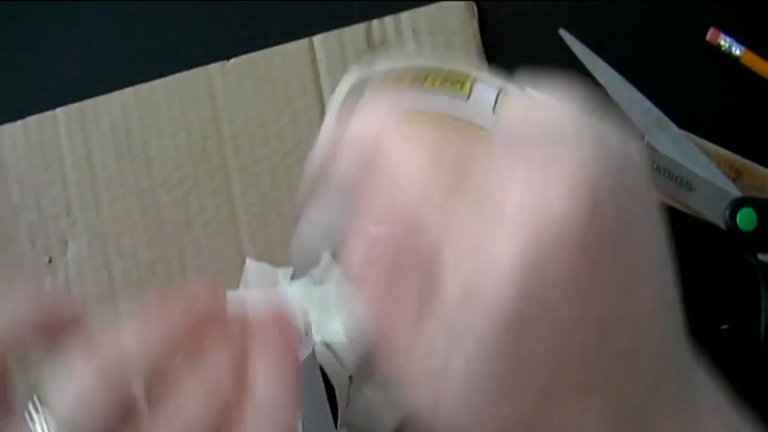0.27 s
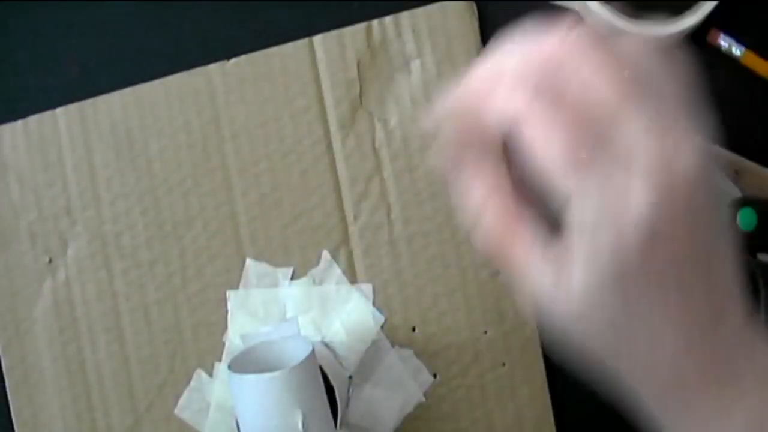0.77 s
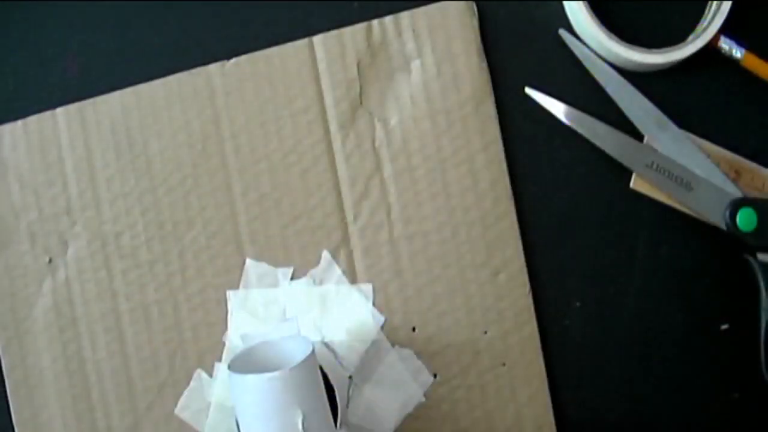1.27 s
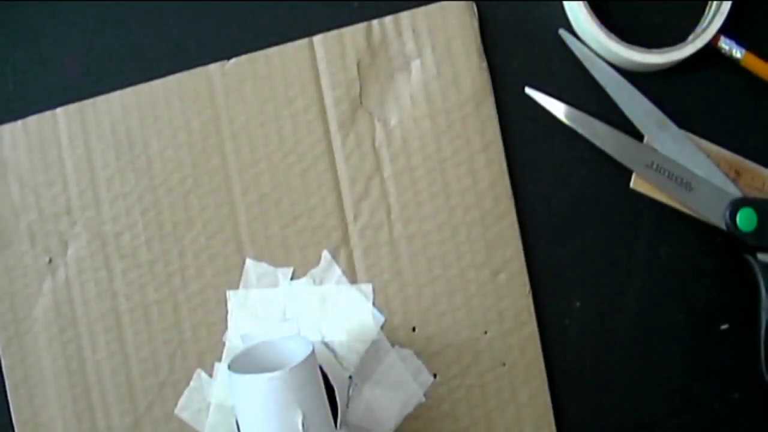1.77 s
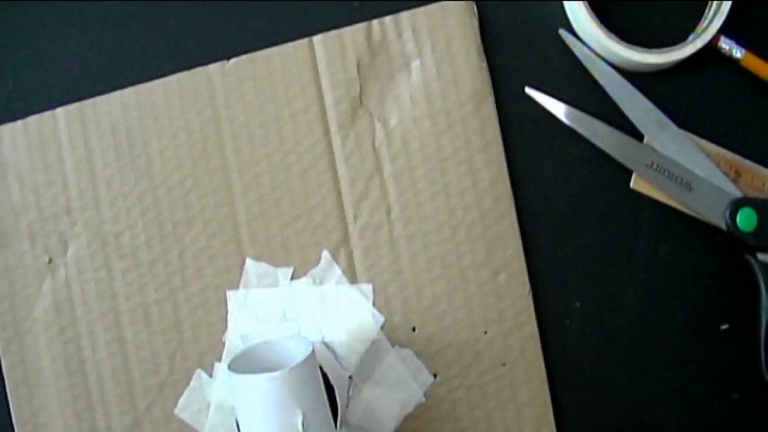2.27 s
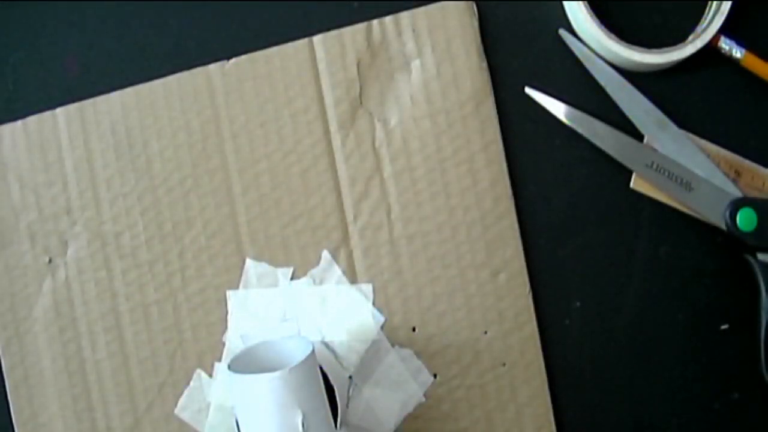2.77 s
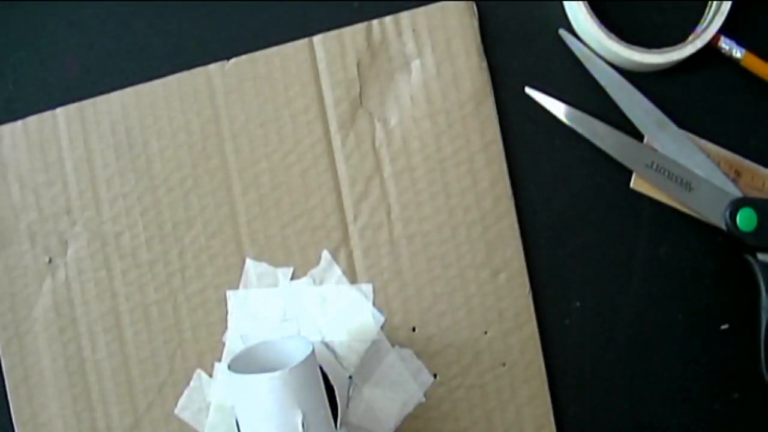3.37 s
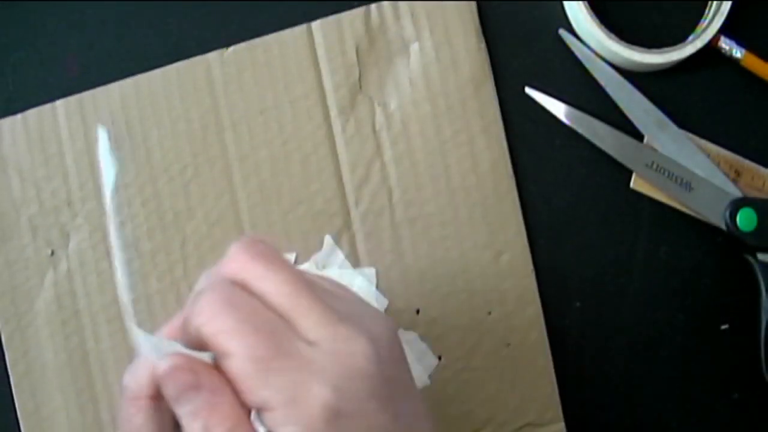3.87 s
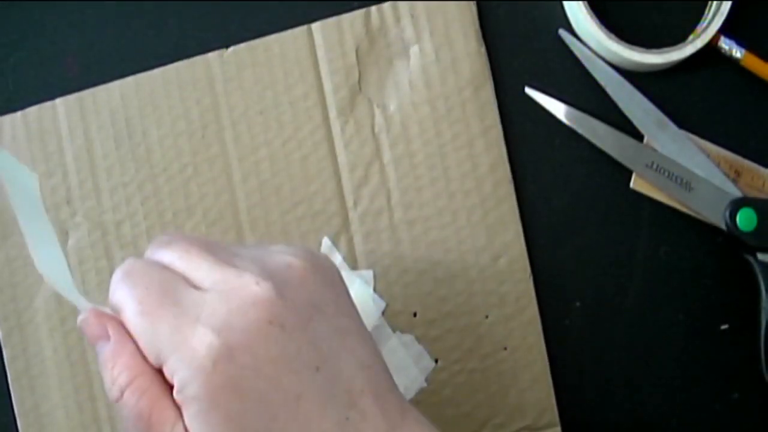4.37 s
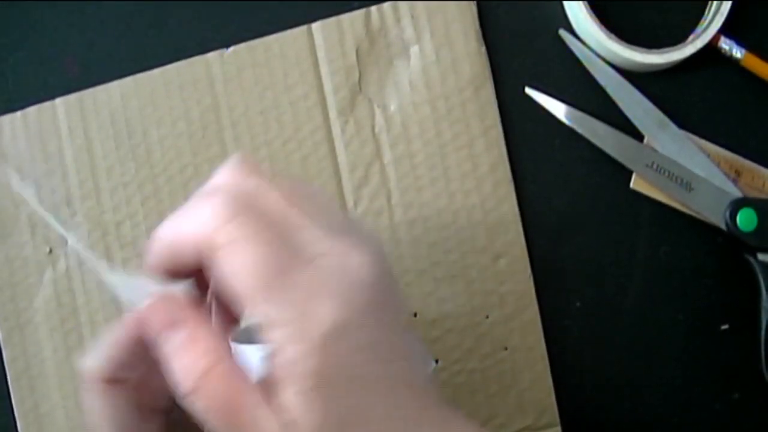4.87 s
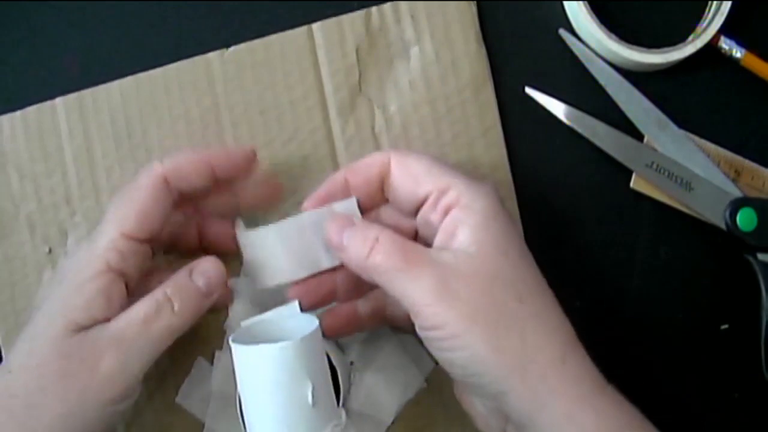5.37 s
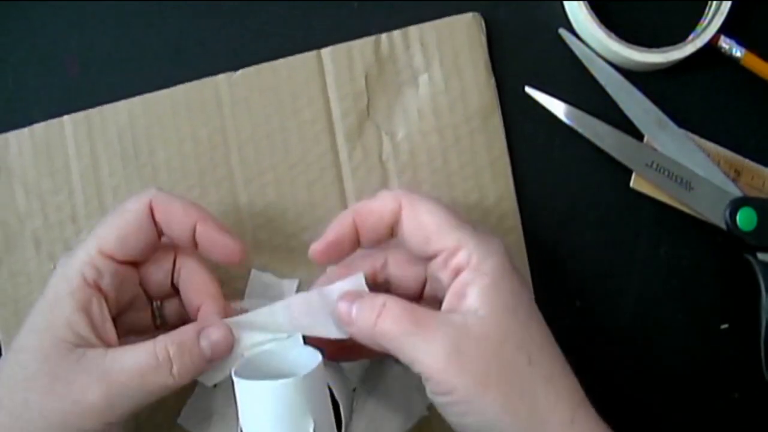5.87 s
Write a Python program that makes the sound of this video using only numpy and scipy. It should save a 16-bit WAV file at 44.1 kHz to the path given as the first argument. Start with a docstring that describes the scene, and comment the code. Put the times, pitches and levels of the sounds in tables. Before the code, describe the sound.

Short growing rips of tape burst out first, bright and dry. A hollow cardboard roll lands, rattles from rim to rim faster and faster, and settles while the table resonates deeply. Over faint rumble and hiss come isolated small clicks, a loud double rip, light scraping and crackling fingers, soft pats, and a light tap before a delicate prolonged rasp. Everything is close, in a small room with a short tail.

```python
"""Masking tape is pulled and torn off its roll in short growing rips, close to a desk microphone, with light rubs.
The roll is put down and rocks to rest: its cardboard core clatters and rings, the table booms and sways.
Fingers pick at the strip, tap the tube, tear twice more, then smooth it with a long rasp of tiny releases.
Between the events a small quiet room answers, over faint rumble and microphone hiss."""
import sys
import numpy as np
from scipy import signal
from scipy.fft import rfft, irfft, next_fast_len
from scipy.io import wavfile
from scipy.ndimage import uniform_filter1d, map_coordinates

SR = 44100
rng = np.random.default_rng(int(sys.argv[2]) if len(sys.argv) > 2 else 0)


def dump(signal):
    """Clip the signal to [-1, 1] and save it as 16-bit WAV at the path in sys.argv[1]."""
    limited = np.clip(np.atleast_2d(signal).T, -1, 1)
    pcm = np.round(limited * 32767).astype(np.int16)
    wavfile.write(sys.argv[1], SR, pcm)


N = 269318  # length in samples

# rips of tape and faint light rubs or scuffs of it; swell is the climb to the final level,
# body and edge tilt the lows and the highs:
# start_s, end_s, final_level_db, swell_db, body_db, edge_db
RIPS_AND_RUBS = [(0.203, 0.224, -32, 10.5, -6.5, 0), (0.214, 0.236, -24, 8.5, -4.5, 1),
                 (0.3645, 0.385, -32.5, 8.5, -13, 1), (0.458, 0.47, -32.5, 9.5, -8.5, -1),
                 (0.605, 0.641, -57, 3, -7, -15), (1.325, 1.346, -49.5, 16, 6.5, 23.5),
                 (1.969, 1.996, -46, 19.5, -1.5, 2.5), (2.432, 2.487, -69.5, -0.5, -13, -10),
                 (2.596, 2.634, -63.5, 0.5, -5.5, -3), (3.147, 3.1665, -28, 41.5, 10.5, -4.5),
                 (3.2472, 3.2537, -23, 10.5, 3.5, 0.5)]
# colour of the ripped or rubbed tape: pitch_hz, level_db
TAPE = [(150, -28.5), (400, -14.5), (700, -15), (1450, -5.5), (2400, -4), (4000, 2), (7000, -2),
        (11500, -1.5), (16000, -11.5)]
# snaps of the strip, and a light tap on the cardboard tube:
# start_s, low_db, middle_db, high_db, note_hz, t60_s
SNAPS_AND_TAP = [(0.2039, -72, -47.5, -48, 2520, 0.0076), (.36, -67, -42, -42, 4240, 0.0031),
                 (0.4697, -59.5, -34.5, -44, 3660, .007), (1.917, -60, -57.5, -48.5, 11000, 0.013),
                 (2.0117, -54.5, -40, -42.5, 11920, 0.013), (2.604, -63.5, -59.5, -59, 1850, 0.016),
                 (3.238, -54.5, -43.5, -47.5, 4514, 0.0079), (5.1454, -59.5, -62, -73, 950, 0.024),
                 (5.705, -58, -67, -76, 1250, 0.015), (5.961, -43, -44.5, -37.5, 8160, 0.022)]
# short squeaks of tape, and the tap's bright part: start_s, pitch_hz, level_db
SQUEAKS = [(1.8243, 2770, -48.5), (3.527, 3350, -57), (3.6124, 3460, -52), (5.1454, 3000, -54.5)]

# the roll lands, rocks from rim to rim ever faster and falls flat: start_s, low_db, middle_db, high_db
KNOCKS = [(.558, -29.5, -31, -40.5), (.611, -38, -44, -51.5), (.699, -40.5, -51, -65),
          (0.7754, -38, -49, -68), (0.8432, -38.5, -51, -64), (0.9003, -41.5, -50.5, -65),
          (.958, -41.5, -48, -66), (1.0048, -39, -43.5, -64.5), (1.045, -41.5, -49, -61),
          (1.0767, -36.5, -39, -45.5)]
# ringing modes of the cardboard core: pitch_hz, level_db, t60_s
CORE = [(252, -5.5, .13), (339.3, 5, 0.11), (402, -1, .15), (510, -1, 0.1312), (606, 6, 0.11),
        (1080, 4, .05), (1765, 9, .09), (3680, 7.5, .05)]
# low part of a knock: pitch_hz, level_db
THUMP = [(110, -33.5), (290, 0.5), (650, 0.5), (850, -9.5), (4000, -72)]
# middle part of a knock: pitch_hz, level_db
CLACK = [(500, -25.5), (800, 1.5), (1150, 3), (1450, -5), (1850, -10), (5000, -58)]
# high part of a knock: pitch_hz, level_db
CRACK = [(1000, -27), (2100, 8.5), (2550, 3), (3000, 3.5), (4700, -11.5), (6000, -28), (15000, -46)]
# colour of the rim rolling between contacts: pitch_hz, level_db
RUMBLE = [(120, -18), (250, -1.5), (340, 0), (470, -8), (610, 1), (800, -18.5), (1800, -19.5), (4000, -50)]
ROLLING_DB = -57.5

# weight landing on the table, and a soft bump of the hand: start_s, boom_db, dull_puff_db, puff_top_hz
THUDS = [(0.56, -34.5, -36.5, 154), (0.957, -45, -61, 104), (1.079, -37.5, -49.5, 151),
         (3.85, -88, -52, 59), (4.445, -50.5, -45, 252), (4.469, -61, -42.5, 69.9)]
# ringing modes of the table top: pitch_hz, level_db, t60_s
TABLE = [(54, -16, 0.91), (65.4, -12.5, 1), (127.6, -1.5, 0.49), (229.3, -1.5, 0.23)]
# shoves that set the table swinging on its legs: start_s, level_db
SHOVES = [(.32, -58), (.56, -37), (.83, -32), (1.058, -33), (3.33, -62.5), (3.84, -50.5), (4.44, -46.5),
          (5.96, -57.5)]
SWAY_RISE_S, SWAY_T60_S = 0.064, 0.91

# short strokes of the fingers along the tape: start_s, end_s, level_db, pressure (0-1)
STROKES = [(3.27, 3.316, -64, .1), (3.358, 3.39, -66, 0.1), (3.503, 3.507, -78.5, 0),
           (3.791, 3.827, -47.5, 0.5), (3.84, 3.887, -63, 0.26), (3.939, 3.989, -51.5, 0.34),
           (4.011, 4.054, -55, 0.39), (4.098, 4.108, -50.5, 0.76), (4.125, 4.197, -57, 0.78),
           (4.261, 4.284, -65, 1), (4.436, 4.523, -68.5, 0.89), (4.648, 4.764, -61, 0.29),
           (4.776, 4.788, -59.5, 0.03), (5.886, 5.894, -64.5, 0.75), (5.905, 5.916, -50.5, 0.67),
           (5.982, 6.008, -63.5, 0.6)]
ATTACK_S, RELEASE_S = 0.11, 0.12  # a stroke's rise and fall over 60 dB
SCRAPE_LIGHT_DB, SCRAPE_FIRM_DB = -16, 4.5  # against the rasp, at pressure 0 and 1
HISS_LIGHT_DB, HISS_FIRM_DB = 6.5, -16  # likewise
# one long slide smooths the strip: time_s, level_db
SLIDE = [(5.19, -92), (5.228, -60), (5.362, -58.5), (5.402, -65.5), (5.558, -59), (5.66, -69), (5.7, -61.5),
         (5.804, -77.5), (5.88, -61)]
SLIDE_PRESSURE, SLIDE_SETTLE_S = 0.77, 0.15  # the fingers bear down gradually
SLIDE_RASP_DB, SLIDE_BRUSH_DB = 5, -6.5  # the taut strip rasps more; the hands brush the cardboard
STROKE_BRUSH_DB = -18.5  # brushing under a stroke's scrape
# colour of the coarse scrape: pitch_hz, level_db
SCRAPE = [(300, -13.5), (700, -7.5), (1200, 2), (1500, 0.5), (1850, 3), (2400, -1), (3300, -24)]
# colour of the rasp over the ridges: pitch_hz, level_db
RASP = [(1500, -18.5), (2400, -4), (3500, 1), (4400, -3), (5300, -1.5), (6100, -7.5), (7500, -38),
        (8500, -30)]
# colour of the light sliding hiss: pitch_hz, level_db
HISS = [(3500, -22.5), (5500, 0), (7300, 0.5), (9000, -2.5), (12000, -4), (16000, -31.5)]
# colour of hands brushing the cardboard: pitch_hz, level_db
BRUSH = [(100, -19), (220, 5.5), (330, 12.5), (550, -17), (900, -26), (2000, -35)]
# the free strip resonates, higher as the grip shortens it: time_s, pitch_hz, boost_db
STRIP = [(3.3, 5350, 5.5), (4.7, 5360, 2.5), (5.23, 2500, 5.5), (5.33, 3500, 3), (5.64, 3950, 5),
         (5.8, 3340, 6.5)]
# soft pats and scuffs of the hands on the cardboard: start_s, level_db, pitch_hz
PATS = [(3.355, -67, 294), (4.45, -51, 275), (5.15, -65.5, 550), (5.29, -66, 285), (5.52, -64.5, 270),
        (5.866, -63, 500)]

# height of the tape over the table: time_s, height_m
HEIGHT = [(.22, 0.16), (.47, .22), (3.2, 0.067), (3.95, 0.048), (4.15, 0.072), (5.21, 0.022), (5.31, 0.067),
          (5.45, 0.078), (5.92, 0.052)]
# decay of the small room: pitch_hz, t60_s
ROOM = [(150, 0.46), (600, .25), (2000, .24), (5000, .25), (11000, 0.17), (16000, 0.21)]
# microphone colour: pitch_hz, level_db
CAPSULE = [(10000, -2), (11700, 1), (12200, -2), (12700, -5.5), (16000, -11.5)]
# colour of the room rumble and microphone hiss: pitch_hz, level_db
FLOOR = [(12, -10), (28, -12), (50, -24), (90, -32), (150, -39), (230, -31), (300, -50), (358, -36.5),
         (1500, -46.5), (2900, -43), (3500, -46), (16000, -52.5)]
FLOOR_DB = -79.5  # of the part above 200 Hz
TOP_HZ = 15900  # band limit of the recorder


def rips_and_rubs(stop_s=0.012, body_hz=1700, edge_hz=7000):
    """Rips grow and stop short; light rubs scuff faintly: noise and tiny releases under one envelope."""
    out, t = np.zeros(N), np.arange(SR // 8) / SR
    for start, end, db, swell_db, body_db, edge_db in RIPS_AND_RUBS:
        length = max(end - start, .002)
        growth_db = swell_db * (np.minimum(t / length, 1) - 1)
        stop_db = -60 * np.maximum(t - length, 0) / stop_s
        grains = crackle(len(t), rate=2200, spread_db=1.5) + 0.84 * rng.standard_normal(len(t))

        def tone(hz):
            """Tape colour with the lows and the highs tilted for this event."""
            body = body_db / (1 + (hz / body_hz) ** 4)
            edge = edge_db / (1 + (edge_hz / (hz + 1)) ** 4)
            return along(TAPE, hz) + body + edge

        moved = colour(grains * amp(growth_db + stop_db), tone)
        add(out, start, amp(db) * moved / np.std(colour(grains, tone)))
    return out


def snaps_and_tap(lead_s=0.017, lead_db=-17, gain_db=-11.0, note_db=6, octaves=0.12):
    """A brief shiver of noise, strongest near a note, after a faint quick swell: paper buckles, or a tap."""
    out, t = np.zeros(N), np.arange(-SR // 48, SR // 24) / SR  # the hit is at t = 0
    for s, low_db, mid_db, high_db, note_hz, t60 in SNAPS_AND_TAP:
        lead = amp(lead_db + 20 * t / lead_s)
        envelope = np.where(t < 0, lead, amp(-60 * t / t60))
        spectrum = [(150, low_db - 27), (1200, low_db + 4.5), (2300, mid_db - 3.5), (3500, mid_db - 3.5),
                    (6000, (mid_db + high_db) / 2 - 1), (11800, high_db), (16000, high_db - 17)]
        size = np.linalg.norm(amp([low_db, mid_db, high_db]))
        shiver = colour(envelope * rng.standard_normal(len(t)),
                        lambda hz: along(spectrum, hz) + note_db * hump(hz, note_hz, octaves))
        add(out, s + t[0], amp(gain_db) * size * unit(shiver))
    return out


def squeaks(t60=0.037):
    """Short squeaks of tape, and the tap's bright part: dying noise in a band around a note."""
    out, t = np.zeros(N), np.arange(SR // 20) / SR
    for s, hz, db in SQUEAKS:
        band = [(hz / 4, -40), (hz * .75, -16), (hz, 0), (hz * 1.3, -17), (hz * 3, -34)]
        squeak = shaped(rng.standard_normal(len(t)), band)
        add(out, s, amp(db - 60 * t / t60) * squeak)
    return out


def roll(clack_t60=.055, strike_db=19, ring_db=-28, thump_db=-12, clack_db=-12, crack_db=-11):
    """Each rim contact strikes, clatters and rings the cardboard core; the rim rumbles between them."""
    out, t = np.zeros(N), np.arange(SR // 3) / SR
    for s, low_db, mid_db, high_db in KNOCKS:
        strike = amp(strike_db) * (t == 0)
        clatter = rng.standard_normal(len(t)) * amp(-60 * t / clack_t60)
        body = strike + clatter + amp(ring_db) * ring(CORE, t, vary_db=5)
        parts = (low_db + thump_db, THUMP), (mid_db + clack_db, CLACK), (high_db + crack_db, CRACK)
        for db, spectrum in parts:
            add(out, s, amp(db) * shaped(body, spectrum))
    rolling = amp(ROLLING_DB) * swell(KNOCKS[0][0], KNOCKS[-1][0], attack_s=.005, release_s=.48)
    return out + rolling * shaped(crackle(N, rate=910, spread_db=2.5), RUMBLE)


def table(puff_t60=0.2613, puff_hz=150, sway_hz=30):
    """Thuds boom and puff dully, deeper puffs rising and dying more slowly; the table swings on its legs."""
    out, t = np.zeros(N), np.arange(SR) / SR
    for s, boom_db, puff_db, top_hz in THUDS:
        dull = [(20, -10), (55, 0), (top_hz, 0), (2 * top_hz, -20), (10 * top_hz, -60)]
        puff = shaped(rng.standard_normal(len(t)), dull)
        # puff_t60 holds for a puff that tops out at puff_hz
        push = amp(puff_db - 60 * t / puff_t60 * top_hz / puff_hz) * (1 - np.exp(-t * top_hz))
        add(out, s, amp(boom_db) * ring(TABLE, t, vary_db=1.0) + push * puff)
    return out + sway(sway_hz)


def sway(sway_hz):
    """Each shove adds a slow swing, of slightly wandering phase, that rises quickly and dies away."""
    shove_s, shove_db = np.array(SHOVES)[:, :1], np.array(SHOVES)[:, 1:]
    age = np.arange(N) / SR - shove_s
    rise = np.clip(age / SWAY_RISE_S, 0, 1)
    reach = rise * amp(shove_db - 60 * np.maximum(age - SWAY_RISE_S, 0) / SWAY_T60_S)
    swing = np.sin(2 * np.pi * sway_hz * np.arange(N) / SR + .5 * wobble(10))
    return np.linalg.norm(reach, axis=0) * unit(swing)


def rubbing(gain_db=-1, catch_db=3.5):
    """Skin catches on the crepe ridges: coarse scrape under pressure, rasp, fine hiss when sliding lightly."""
    scrape, rasp, hiss, hands = fingers()
    grip = amp(1.1 * wobble(90))
    catch = amp(catch_db * wobble(30))
    coarse = scrape * catch * shaped(crackle(N, rate=700, spread_db=0), SCRAPE)
    ridges = rasp * shaped(crackle(N, rate=4400, spread_db=1.5), RASP)
    fine = hiss * shaped(crackle(N, rate=15000, spread_db=2.0), HISS)
    brush = hands * catch * shaped(rng.standard_normal(N), BRUSH)
    return amp(gain_db) * (grip * (coarse + ridges + fine) + brush)


def fingers(slide_db=-2.5):
    """Gains of scrape, rasp, hiss and brushing from the strokes and the long slide."""
    touches = [touch(amp(db) * swell(start, end, ATTACK_S, RELEASE_S), pressure)
               for start, end, db, pressure in STROKES]
    strokes = np.linalg.norm(touches, axis=0)
    age = np.maximum(np.arange(N) / SR - SLIDE[0][0], 0)
    pressure = SLIDE_PRESSURE * (1 - np.exp(-age / SLIDE_SETTLE_S))
    scrape, rasp, hiss = touch(amp(slide_db) * gains(SLIDE)[0], pressure)
    brush = amp(STROKE_BRUSH_DB) * strokes[0] + amp(SLIDE_BRUSH_DB) * rasp
    return *np.hypot(strokes, [scrape, amp(SLIDE_RASP_DB) * rasp, hiss]), brush


def touch(gain, pressure):
    """Gains of scrape, rasp and hiss: pressing harder trades hiss for scrape."""
    scrape_db = SCRAPE_LIGHT_DB + pressure * (SCRAPE_FIRM_DB - SCRAPE_LIGHT_DB)
    hiss_db = HISS_LIGHT_DB + pressure * (HISS_FIRM_DB - HISS_LIGHT_DB)
    return gain * amp(scrape_db), gain, gain * amp(hiss_db)


def strip(x, octaves=0.23, patchy_db=3.0, trim=0.51):
    """The flexing strip colours the rubbing with a moving resonance and shifting patches."""
    hz, t, z = signal.stft(x, SR, nperseg=512)
    s, note_hz, boost_db = np.transpose(STRIP)
    bell = hump(hz[:, None], np.interp(t, s, note_hz), octaves)
    resonance_db = np.interp(t, s, boost_db) * (bell - trim)
    patches = uniform_filter1d(rng.standard_normal(z.shape), size=5, axis=0)  # smooth over frequency
    patches = uniform_filter1d(patches, size=10, axis=1)  # and over time
    return signal.istft(z * amp(resonance_db + patchy_db * unit(patches)), SR, nperseg=512)[1][:N]


def pats(attack_s=0.089, release_s=0.17, octaves=0.93, skirt_db=-55):
    """Each soft touch stirs a hollow band of the cardboard."""
    out, t = np.zeros(N), np.arange(-SR // 8, SR // 4) / SR
    press = amp(-60 * np.maximum(-t / attack_s, t / release_s))
    for s, db, note_hz in PATS:
        band = lambda hz: skirt_db * (1 - hump(hz, note_hz, octaves))
        hollow = unit(colour(rng.standard_normal(len(t)), band))
        add(out, s + t[0], amp(db) * press * hollow)
    return out


def table_echo(x, bounce, dull_hz=6000):
    """The tape's underside radiates in opposite phase; a share bounces off the table and combs the sound."""
    n = np.arange(N)
    height_m = np.interp(n / SR, *np.transpose(HEIGHT))
    lag = 2 * height_m / 343 * SR  # samples down and back at 343 m/s
    soft = irfft(rfft(x) / (1 + (np.fft.rfftfreq(N, 1 / SR) / dull_hz) ** 4), N)
    share = np.clip(bounce, 0, 1)
    return (x - share * map_coordinates(soft, [n - lag])) / np.sqrt(1 + share ** 2)


def room(x, gap_s=0.0015):
    """Diffuse answer of the small room after a short gap; each frequency dies at its own speed."""
    hz, t, z = signal.stft(rng.standard_normal(SR // 2), SR, nperseg=256)
    decay = amp(-60 * t / along(ROOM, hz)[:, None])
    tail = signal.istft(z * decay, SR, nperseg=256)[1]
    tail *= np.clip(np.arange(len(tail)) / SR / gap_s - 1, 0, 1)  # silent for gap_s, full after twice that
    return signal.fftconvolve(x, tail / np.linalg.norm(tail))[:N]


def background():
    """Faint room rumble and microphone hiss as one steady coloured noise."""
    noise = shaped(rng.standard_normal(N), FLOOR)
    above_rumble = signal.sosfilt(signal.butter(4, 200, 'high', fs=SR, output='sos'), noise)
    return amp(FLOOR_DB) * noise / np.std(above_rumble)


def amp(db):
    """Decibels to gain."""
    return 10 ** (np.asarray(db) / 20)


def unit(x):
    """Scale to rms 1."""
    return x / np.sqrt(np.mean(x ** 2) + 1e-20)


def along(points, hz):
    """(Hz, value) points read on a log axis."""
    f, v = np.transpose(points)
    return np.interp(np.log(hz + 1), np.log(f + 1), v)


def hump(hz, centre_hz, octaves):
    """A bell of height 1 around a frequency."""
    return np.exp(-.5 * (np.log2((hz + 1) / centre_hz) / octaves) ** 2)


def gains(rows):
    """One gain per sample for each dB column, silent outside the rows."""
    s, *cols = np.transpose(rows)
    return [amp(np.interp(np.arange(N) / SR, s, c, left=-150, right=-150)) for c in cols]


def swell(start, end, attack_s, release_s):
    """Gain that rises, holds from start to end and dies away."""
    t = np.arange(N) / SR
    return amp(-60 * (np.maximum(start - t, 0) / attack_s + np.maximum(t - end, 0) / release_s))


def wobble(rate):
    """A smooth random curve, rate knots a second."""
    knots = rng.standard_normal(int(N * rate / SR) + 4)
    return map_coordinates(knots, [np.arange(N) * rate / SR])


def colour(x, db_of_hz):
    """Causal minimum-phase filter with the given dB response, made by folding its cepstrum."""
    m = 2 * next_fast_len(len(x) // 2 + 4096)
    response = np.maximum(amp(db_of_hz(np.fft.rfftfreq(m, 1 / SR))), 1e-6)
    cep = irfft(np.log(response), m)
    cep[1:m // 2] *= 2
    cep[m // 2 + 1:] = 0
    return irfft(rfft(x, m) * np.exp(rfft(cep)), m)[:len(x)]


def shaped(x, spectrum):
    """x coloured by (Hz, dB) points, at rms 1."""
    return unit(colour(x, lambda hz: along(spectrum, hz)))


def add(track, s, x):
    """Mix x into the track at time s."""
    part = track[max(round(s * SR), 0):][:len(x)]
    part += x[:len(part)]


def crackle(size, rate, spread_db):
    """Tiny releases, about rate a second, at random moments and of random sizes, rms 1."""
    hit = rng.random(size) < rate / SR
    sign = rng.choice([-1, 1], size)
    return unit(hit * sign * amp(spread_db * np.clip(rng.standard_normal(size), -2, 2)))


def ring(modes, t, vary_db):
    """Damped modes, struck at new strengths each time."""
    out = np.zeros(len(t))
    for hz, db, t60 in modes:
        sign = rng.choice([-1, 1])
        decay = amp(db + vary_db * rng.normal() - 60 * t / t60)
        out += sign * decay * np.sin(2 * np.pi * hz * t)
    return out


def scene():
    """All sources reach one close microphone, fed alike to both channels."""
    tape = table_echo(rips_and_rubs(), bounce=0.22)
    clicks = snaps_and_tap() + squeaks()
    knocks = roll()
    rub = table_echo(strip(rubbing()), bounce=0.2)
    wet = room(amp(-8.5) * tape)
    wet += room(amp(-10.0) * clicks + amp(-12.5) * rub)
    wet += room(amp(-5.5) * knocks)
    air = tape + clicks + knocks + rub + wet + table() + pats()
    mono = colour(air, lambda hz: along(CAPSULE, hz)) + background()
    return np.array([mono, mono])


def record(dry, ceiling=0.12):
    """The recorder rounds off the tallest peaks and keeps nothing above its band limit."""
    rounded = dry / (1 + (dry / ceiling) ** 4) ** (1 / 4)
    m = next_fast_len(N + SR // 2)
    in_band = np.fft.rfftfreq(m, 1 / SR) < TOP_HZ
    return irfft(rfft(rounded, m) * in_band, m)[:, :N]


dry = scene()
out = record(dry)
dump(out)
```